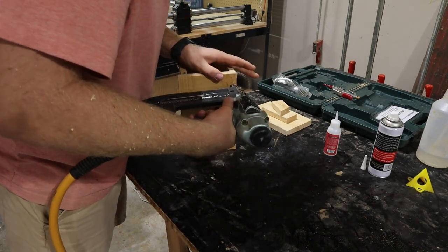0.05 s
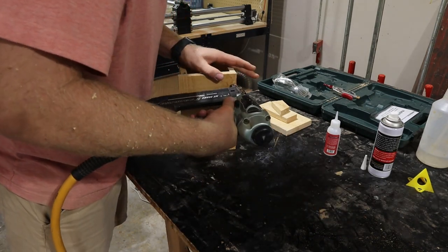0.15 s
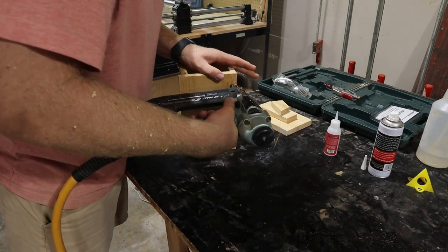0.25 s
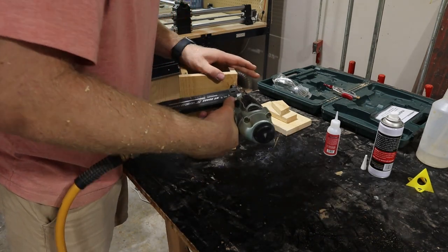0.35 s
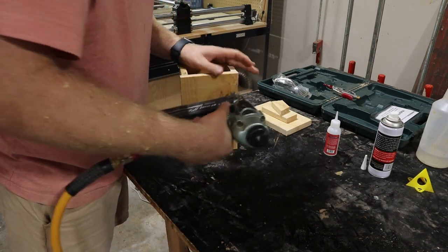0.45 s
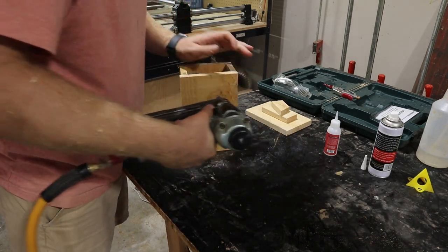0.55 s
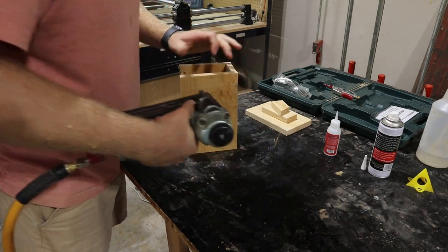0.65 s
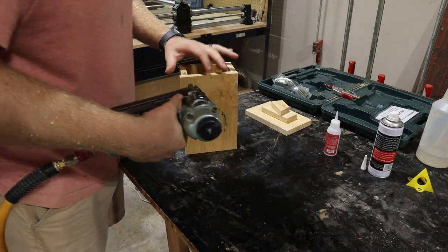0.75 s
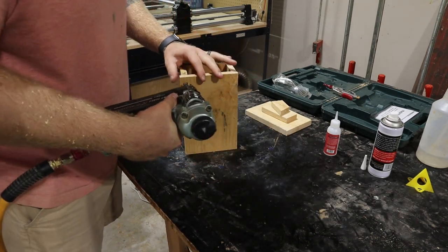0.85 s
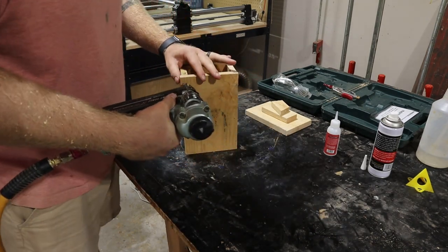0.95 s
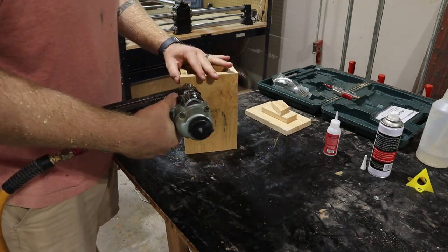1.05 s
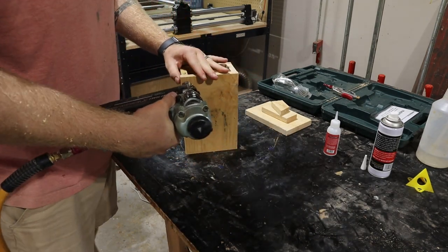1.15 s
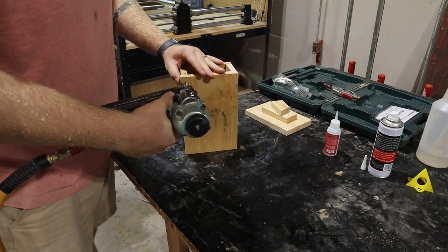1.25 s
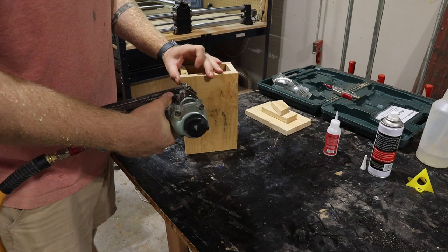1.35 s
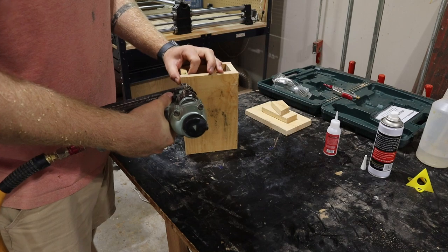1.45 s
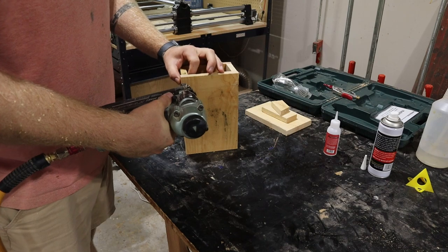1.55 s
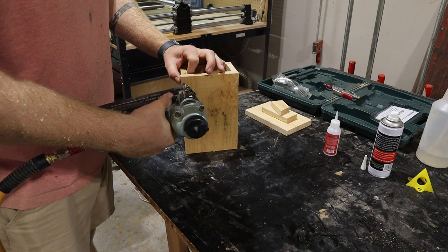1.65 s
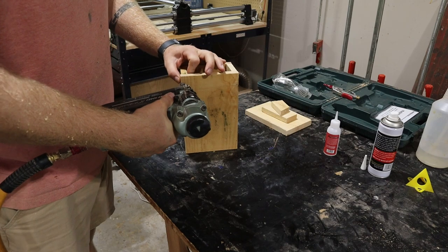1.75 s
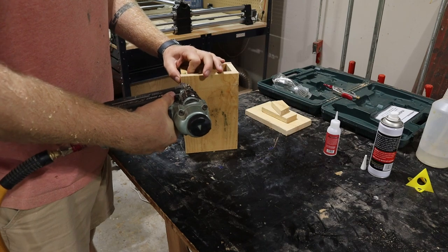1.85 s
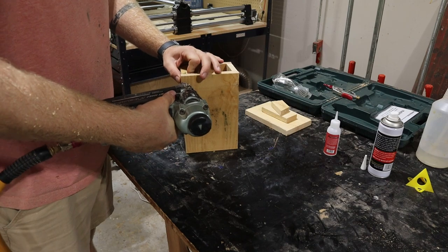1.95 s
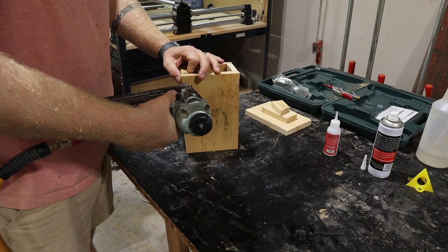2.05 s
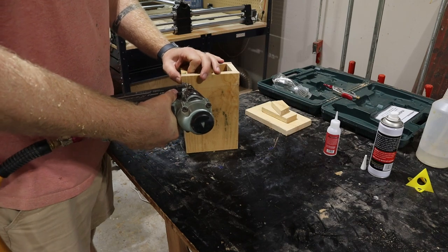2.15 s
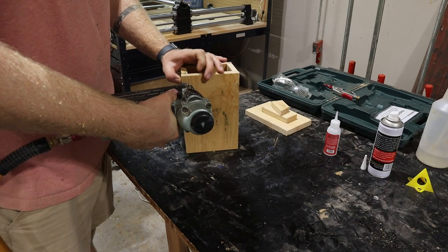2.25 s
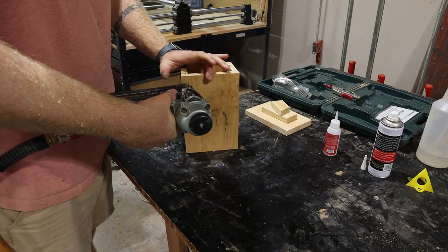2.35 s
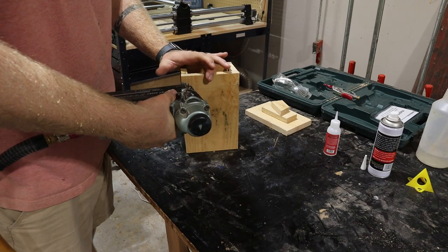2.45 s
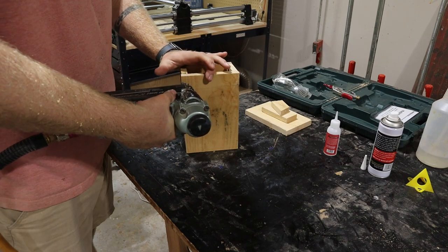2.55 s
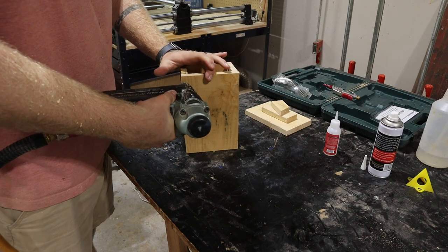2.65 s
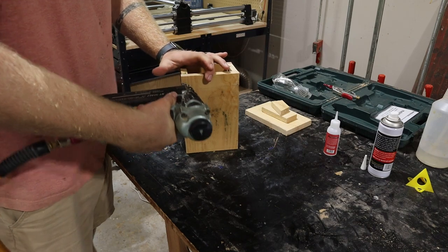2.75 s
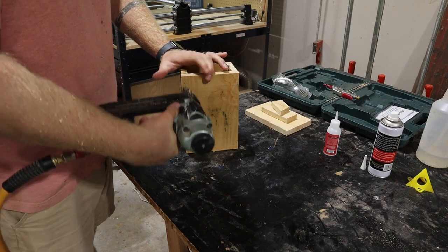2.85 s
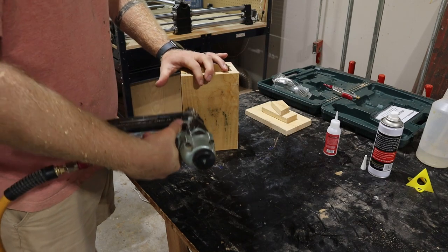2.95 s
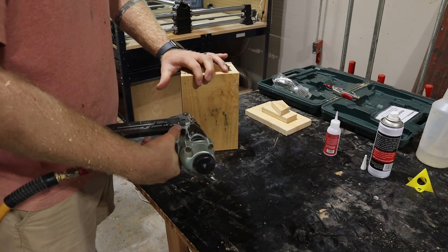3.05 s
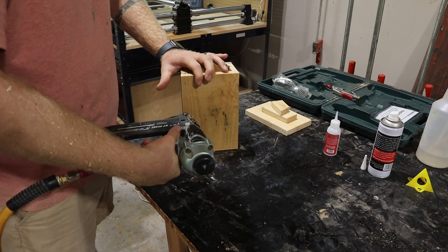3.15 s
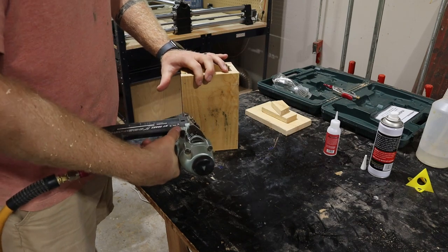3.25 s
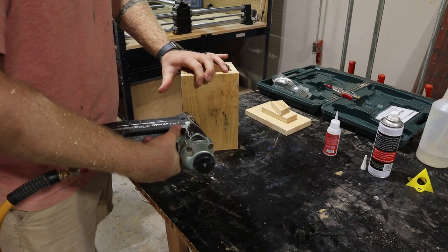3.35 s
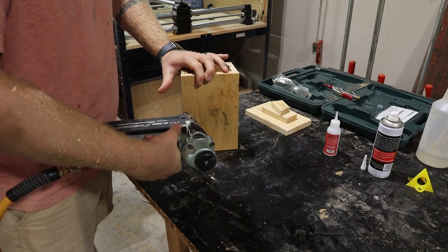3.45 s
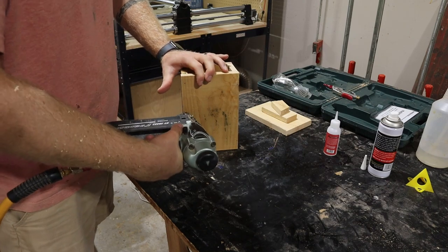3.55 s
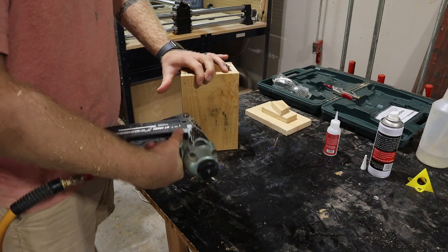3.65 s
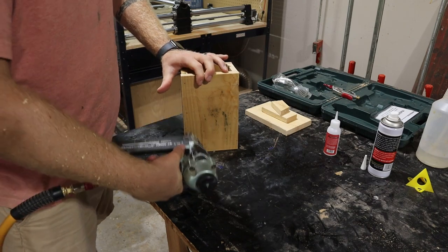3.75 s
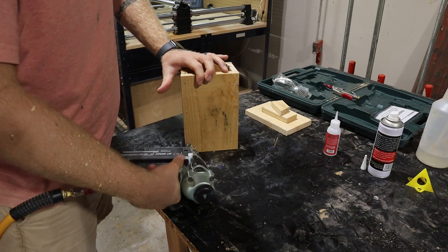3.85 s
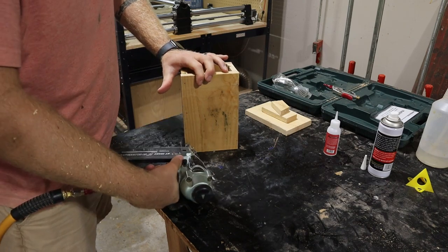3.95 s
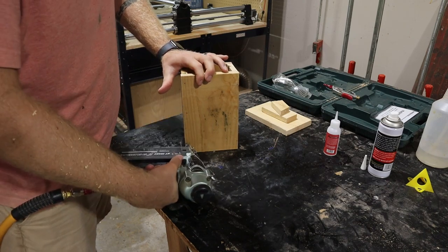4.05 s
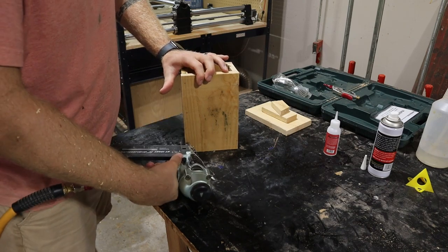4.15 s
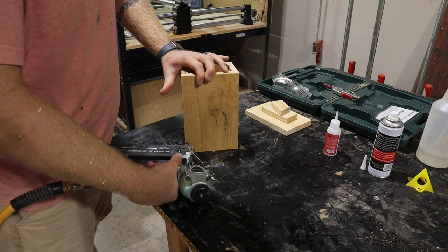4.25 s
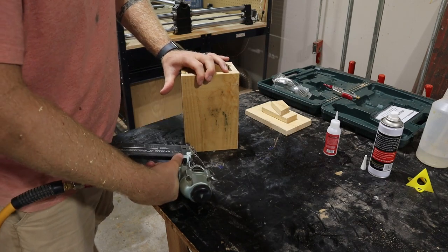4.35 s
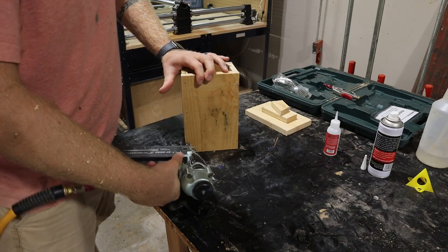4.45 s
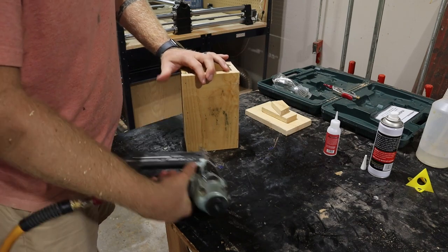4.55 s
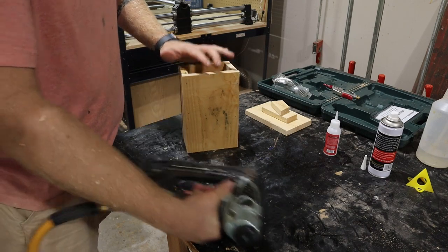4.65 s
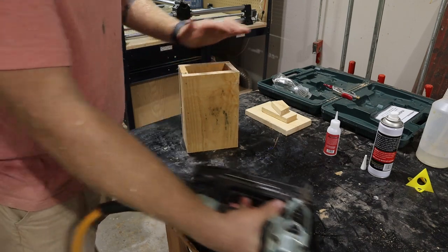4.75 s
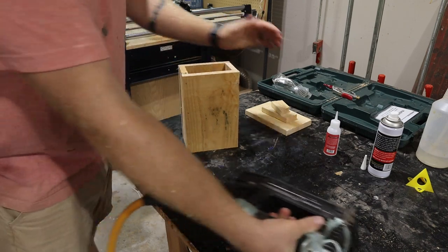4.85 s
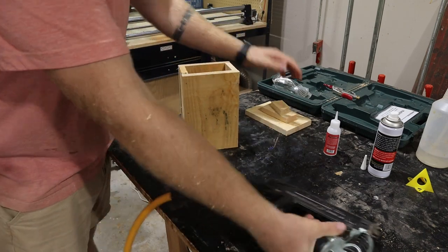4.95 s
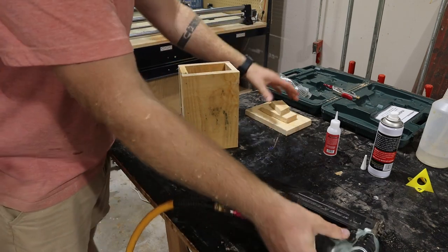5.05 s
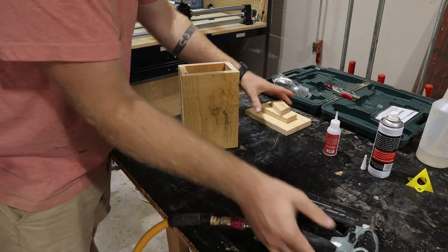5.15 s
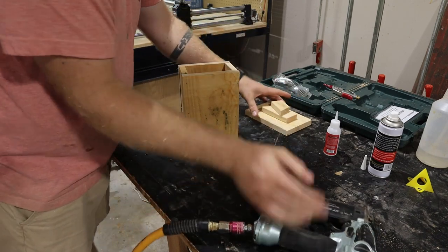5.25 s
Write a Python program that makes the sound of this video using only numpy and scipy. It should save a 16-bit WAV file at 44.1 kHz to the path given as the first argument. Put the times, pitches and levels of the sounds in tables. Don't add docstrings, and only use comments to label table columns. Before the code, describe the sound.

One early nail gun bang, a pause with soft handling and nose knocks on wood, then three more bangs under a second apart. Every bang has a hard double-hit attack and a brief air exhaust just after. Low hum and rustling lie far beneath. At the end the tool rattles down on the bench with woody thuds. Mono, close microphone, distorted peaks, pumping gain and short room reverberation.

```python
import sys
import numpy as np
from scipy import signal
from scipy.fft import rfft, irfft
from scipy.io import wavfile

SR = 44100
rng = np.random.default_rng(int(sys.argv[2]) if len(sys.argv) > 2 else 0)


def gain_from_decibels(decibels):
    exponent = np.asarray(decibels, float) / 20
    return 10 ** exponent


def bounce(signal):
    frames = np.transpose(np.atleast_2d(signal))
    limited = np.clip(frames, -1, 1)
    pcm = np.round(limited * 32767).astype(np.int16)
    wavfile.write(sys.argv[1], SR, pcm)


N = 233681
BLAST_S = .0030

# strike t/s, strike level/dB, driver ring f/Hz, bumper level/dB, box thump level/dB
SHOTS = [
    (0.263, -3.5, 1810, -5, -12.5),
    (2.6575, 1.5, 1692, -0.5, -24.5),
    (3.5576, 2.5, 1850, -0.5, -43),
    (4.3860, -0.5, 1460, -4, -5),
]
# valve t/s, valve level/dB, closing level/dB, air puff level/dB, puff f/Hz
RELEASES = [
    (0.3573, 0, 6.5, -25.5, 140),
    (2.7750, -1, 10.5, -22, 240),
    (3.6622, 2.5, 5, -18.5, 71),
    (4.5, -3.5, 6.5, -20, 124),
]
# f/Hz, level per Hz/dB
JET = [(120, -32), (200, -6), (1300, -20), (3290, 1.5), (3660, 1.5), (4320, -7.5), (5180, 4), (7180, -1.5),
       (12400, 4.5), (15400, 3.5)]
# t/s, rustle level/dB
BUSTLE = [(0, -70.5), (1.0, -71.5), (1.27, -68), (1.45, -64), (1.68, -67), (2.15, -58.5), (2.35, -61),
          (2.6, -59), (3.15, -68.5), (3.5, -61.5), (4.15, -68), (4.3, -62), (4.9, -71.5), (5.02, -73.5),
          (5.15, -53.5), (5.3, -58.5)]


def at_hz(points, hz):
    table = np.array(points)
    return np.interp(np.log(hz), np.log(table[:, 0]), table[:, 1])


def noise(spectrum, size):
    hz = np.maximum(np.fft.rfftfreq(size, 1 / SR), 1)
    x = irfft(rfft(rng.standard_normal(size)) * gain_from_decibels(at_hz(spectrum, hz)), size)
    return x / np.std(x)


def band(x, lo_hz, hi_hz):
    return signal.sosfilt(signal.butter(2, [lo_hz, min(hi_hz, .45 * SR)], "band", fs=SR, output="sos"), x)


def dying(t60, rise=0.00074):
    t = np.arange(SR // 4) / SR
    return (1 - np.exp(-t / rise)) * gain_from_decibels(-60 * t / t60)


def ring(hz, t60, rise=0.00085):
    return dying(t60, rise) * np.sin(2 * np.pi * hz * np.arange(SR // 4) / SR)


def thump(t60, hi_hz):
    low = band(rng.standard_normal(SR // 4), 22, hi_hz)
    rumble = dying(t60, rise=0.00051) * gain_from_decibels(-2.5) * low / np.std(low)
    return rumble + ring(0.39 * hi_hz, 1.6 * t60, rise=0.0011)


def click():
    white = rng.standard_normal(SR // 4)
    bright = band(white, 3000, 15000) + gain_from_decibels(11.5) * band(white, 4840, 6160)
    return bright * dying(0.015, rise=0.0005)


def add(out, s, x):
    i = round(s * SR)
    out[i:i + len(x)] += x[:N - i]


def shop():
    # f/Hz, width/Hz, level/dB
    hums = [(94.4, 6, -4), (193.6, 3.6, -4.5), (360, 66, -6), (587, 41, -12), (859, 34, -5.5)]
    # t/s, level/dB
    machine = [(0, -67), (1.3, -70), (1.95, -60), (2.15, -61.5), (2.35, -59), (2.6, -61), (3.1, -89),
               (4.2, -82), (4.85, -72.5), (5.3, -61)]
    # f/Hz, level per Hz/dB
    rustle_colour = [(15, -39), (25, -21), (97, -4.5), (155, -9.5), (186, -7.5), (247, -15), (289, -5.5),
                     (682, -14), (862, -8.5), (1120, -13), (2860, -24), (7110, -43), (12600, -50),
                     (16400, -86.5), (22000, -120)]
    # f/Hz, level per Hz/dB
    scuff_colour = [(1200, -22), (2600, -1), (3600, 3), (4400, -8), (5500, -6), (7500, -16.5),
                    (12600, -18.5), (13400, -40)]
    # middle t/s, half length/s, level/dB
    slides = [(0, 0.24, -84), (1.017, 0.085, -90.5), (1.434, 0.18, -76), (1.94, 0.1, -76),
              (2.45, 0.75, -72.5), (4.29, 0.17, -73), (4.959, 0.087, -80.5)]
    t = np.arange(N) / SR

    hum = np.zeros(N)
    for hz, width, db in hums:
        waver = band(rng.standard_normal(N), hz - width / 2, hz + width / 2)
        hum += gain_from_decibels(db) * waver / np.std(waver)

    flicker = band(rng.standard_normal(N), 2.5, 40)
    rustle = noise(rustle_colour, N) * gain_from_decibels(0.5 * flicker / np.std(flicker))

    catch = band(rng.standard_normal(N), 3.7, 150)
    sliding = gain_from_decibels(-81.5) + np.zeros(N)
    for s, half, db in slides:
        sliding += gain_from_decibels(db) * np.exp(-((t - s) / half) ** 2)
    scuff = noise(scuff_colour, N) * sliding * gain_from_decibels(1.83 * catch / np.std(catch))

    hum_level = gain_from_decibels(np.interp(t, *np.transpose(machine)) - 3.0)
    rustle_level = gain_from_decibels(np.interp(t, *np.transpose(BUSTLE)))
    return scuff + hum_level * hum + rustle_level * rustle


def crumbs():
    hits_per_s, crumb_t60_s, crumb_db = 58, .025, 14.5
    mains_hz, mains_width_hz, mains_db = 56, 7.9, -75.5
    t = np.arange(N) / SR
    strength = gain_from_decibels(3.5 * np.minimum(rng.exponential(1, N), 3))
    hits = (rng.random(N) < hits_per_s / SR) * strength
    dealt = rng.integers(0, 6, N)
    out = np.zeros(N)
    for k, hz in enumerate(np.geomspace(300, 5000, 6)):
        shake = signal.lfilter([1], [1, -gain_from_decibels(-60 / (crumb_t60_s * SR))], hits * (dealt == k) + 1e-18)
        grain = band(rng.standard_normal(N), hz / 1.4, hz * 1.1)
        out += gain_from_decibels(-3.5 * k) * shake * grain / np.std(grain)
    mains = band(rng.standard_normal(N), mains_hz - mains_width_hz / 2, mains_hz + mains_width_hz / 2)
    level = gain_from_decibels(np.interp(t, *np.transpose(BUSTLE)) + crumb_db - 18)
    return level * out + gain_from_decibels(mains_db) * mains / np.std(mains)


def steel():
    # t/s, level/dB, ring f/Hz, ring level over the click/dB
    parts = [(0.025, -60, 5500, -21.5), (0.0744, -40.5, 3120, 6.5), (1.458, -54, 3210, 4),
             (1.718, -63, 8440, -12), (1.8908, -46, 6470, -16), (2.322, -62, 2000, 6.5),
             (2.531, -63, 5000, -6), (2.58, -63, 6550, -3), (3.188, -65, 2300, 4), (3.361, -45.5, 3900, -4),
             (3.494, -64, 6000, -6), (4.055, -52, 4940, -5), (4.207, -44, 3070, 9), (5.037, -32, 3910, 2),
             (5.058, -42, 6280, -2), (5.068, -43, 7500, -6), (5.14, -52, 5240, -3), (5.285, -48.5, 5560, 8)]
    out = np.zeros(N)
    for s, db, hz, ring_db in parts:
        add(out, s, gain_from_decibels(db) * (click() + gain_from_decibels(ring_db) * ring(hz, 0.025)))
    return out


def knocks(rows, click_db):
    out = np.zeros(N)
    for s, wood_db, wood_hz, hard_db in rows:
        white = rng.standard_normal((2, SR // 4))
        grain = band(white[1], .45 * wood_hz, 2.2 * wood_hz)
        wood = ring(wood_hz, 0.04, rise=0.00054) + gain_from_decibels(10.5) * grain * dying(0.026, rise=0.00087)
        wood += gain_from_decibels(-6.0) * (ring(501, 0.047) - ring(1120, 0.0064))

        tick_hz = 1620 * gain_from_decibels(2 * rng.standard_normal())
        tick = gain_from_decibels(-7.5) * ring(tick_hz, 0.016)
        tick += gain_from_decibels(1.0) * band(white[0], 1100, 3600) * dying(0.029, rise=0.00075)
        hard = gain_from_decibels(5.0) * tick + gain_from_decibels(click_db) * click()
        add(out, s, gain_from_decibels(wood_db - 2.0) * wood + gain_from_decibels(wood_db + hard_db) * hard)
    return out


def blow(db, crack_db):
    # f/Hz, level/dB, t60/s
    body = [(480, -11, .025), (820, -7, .03), (1180, -8, .025), (2050, -8, .016), (2550, -10, .014),
            (3600, -14, .01), (5300, -13, .01)]
    # f/Hz, level per Hz/dB
    crack_colour = [(200, -7), (800, -3.5), (2200, 4), (4000, -0.5), (6000, -9.5), (9000, -14.5),
                    (13000, -24.5), (17000, -44.5)]
    modes = np.zeros(SR // 4)
    for hz, mode_db, t60 in body:
        a, b = rng.standard_normal(2)
        modes += gain_from_decibels(mode_db + 1.3 * a) * np.sign(b) * ring(hz * gain_from_decibels(0.071 * b), t60)
    snap = gain_from_decibels(0.5) * dying(0.0043, rise=.0001) * noise(JET, SR // 4)
    crack = gain_from_decibels(crack_db) * dying(0.018) * noise(crack_colour, SR // 4)
    return gain_from_decibels(db) * (modes + snap + crack)


def shots():
    inrush_s, bumper_s, rebound_s, settle_s = .0058, .0056, .0092, .0125
    out, t = np.zeros(N), np.arange(SR // 4) / SR
    size = round(inrush_s * SR)
    tightening = t - 0.000281 * (1 - np.exp(-t / 0.00058))
    sunk = np.exp(-(t / .0014) ** 2) * (1 - np.exp(-t / .00005))
    for s, strike_db, ring_hz, bumper_db, thump_db in SHOTS:
        add(out, s - inrush_s, gain_from_decibels(-35.5) * np.linspace(0, 1, size) ** 0.43 * noise(JET, size))
        add(out, s, -gain_from_decibels(strike_db) * sunk * np.sin(2 * np.pi * 1.134 * ring_hz * tightening))
        add(out, s, blow(bumper_db - 13.5, crack_db=10.5))

        bumper = blow(bumper_db, crack_db=0.5)
        bumper += gain_from_decibels(bumper_db - 6) * ring(1.3 * ring_hz, 0.0027)
        bumper += gain_from_decibels(thump_db) * thump(0.038, hi_hz=321)
        add(out, s + bumper_s, bumper)
        add(out, s + rebound_s, blow(bumper_db + .5, crack_db=1.5))
        add(out, s + settle_s, blow(bumper_db - 2.5, crack_db=-0.5))
    return out


def exhaust():
    # f/Hz, level per Hz/dB
    spill = [(120, -50.5), (200, -6), (461, -14.5), (872, -6), (1500, -14), (2330, -10), (2590, -7.5),
             (3600, -9.5), (9090, -9.5), (12400, -4), (15400, -9.5)]
    closing_s, blast_db, puff_cycles = .0268, -2.5, 6.4
    direct, spilled = np.zeros(N), np.zeros(N)
    t = np.arange(SR // 4) / SR
    shut = 1 / (1 + np.exp(np.clip((t - closing_s + BLAST_S) / .0008, -50, 50)))
    pressure = dying(1.0, rise=0.00012) * shut
    for s, valve_db, closing_db, puff_db, puff_hz in RELEASES:
        valve = ring(1970, 0.005, rise=0.00055) + gain_from_decibels(5) * ring(2530, 0.0038, rise=0.00074)
        add(direct, s, -gain_from_decibels(valve_db) * valve)

        closing = (ring(1410, 0.0082, rise=0.00039) + ring(2400, 0.015, rise=0.00024)) / 2
        add(direct, s + closing_s, gain_from_decibels(closing_db) * closing)
        add(direct, s + closing_s + 0.00075, blow(closing_db - 19.5, crack_db=7.0))

        add(direct, s + BLAST_S, gain_from_decibels(blast_db) * pressure * noise(JET, len(t)))
        add(spilled, s + BLAST_S, gain_from_decibels(blast_db) * pressure * noise(spill, len(t)))
        puff = thump(puff_cycles / puff_hz, hi_hz=3.9 * puff_hz)
        add(direct, s + BLAST_S - .0015, -gain_from_decibels(puff_db) * puff)
    return direct, spilled


def room(x):
    # f/Hz, t60/s, level/dB
    tail_table = [(102.3, 0.48, -23), (302, 0.23, -4), (850, 0.37, 2.5), (2000, 0.43, -1), (5570, 0.39, -2),
                  (12200, 0.29, -7.5)]
    t60_points, db_points = [r[:2] for r in tail_table], [r[::2] for r in tail_table]
    edges = 50 * 2 ** (np.arange(27) / 3)
    white, tail = rng.standard_normal((2, N)), np.zeros(N)
    build = np.exp(-1 / (0.00043 * SR))
    for k, (lo, hi) in enumerate(zip(edges, edges[1:])):
        t60, db = at_hz(t60_points, lo), at_hz(db_points, lo)
        keep = gain_from_decibels(-120 / (t60 * SR))
        energy = band(x + 1e-9 * white[0], lo, hi) ** 2
        decay = np.convolve([1, -keep], [1, -build])
        stored = signal.lfilter([(1 - keep) * (1 - build)], decay, energy)
        carrier = band(white[k % 2], lo, hi)
        tail += gain_from_decibels(db) * np.sqrt(np.abs(stored)) * carrier / np.std(carrier)
    return tail


def scene():
    # t/s, wood level/dB, wood f/Hz, hardness of the tick over the wood/dB
    touches = [(0.075, -36.5, 1134, -20), (0.0765, -33.5, 557, -29), (1.351, -55, 609, 1.5),
               (1.383, -51, 356, 4.5), (1.581, -55, 346, 6.5), (1.812, -46.5, 255, -30),
               (1.852, -54, 1750, -12), (1.976, -29, 956, -10), (1.977, -30.5, 530, -25),
               (1.998, -43, 460, -8), (2.06, -41.5, 386, -2.5), (2.146, -45, 340, -30),
               (2.198, -50, 570, -2.5), (2.264, -40.5, 1250, -4.5), (2.27, -42.5, 467, -17),
               (3.163, -46, 477, -3), (3.175, -45.5, 207, -7), (3.393, -45, 490, -9),
               (3.406, -29.5, 553, -4.5), (3.408, -35, 1350, -24), (3.463, -43.5, 367, -7),
               (4.016, -42, 510, -9), (4.026, -37.5, 428, -14), (4.076, -44.5, 517, -3),
               (4.207, -29, 441, -7), (4.214, -39, 405, 6), (4.253, -41, 574, -4), (4.336, -43, 605, -1),
               (2.118, -50, 446, -25)]
    # same columns
    # t/s, wood level/dB, wood f/Hz, hardness of the tick over the wood/dB
    set_down = [(5.033, -40, 1340, -6), (5.038, -28.5, 705, 5.5), (5.056, -29.5, 854, -9),
                (5.067, -36.5, 488, 3), (5.088, -37, 345, -4), (5.131, -34, 850, 0.5), (5.14, -49, 940, -9),
                (5.167, -36, 270, -12), (5.178, -38, 358, -6.5), (5.23, -21.5, 730, -11),
                (5.233, -21.5, 282, -19), (5.243, -29, 900, -25), (5.255, -30.5, 481, -17),
                (5.28, -25.5, 700, -26), (5.285, -24, 420, -7.5), (5.292, -25, 474, -30),
                (5.041, -28.5, 295, -25)]
    background = shop() + crumbs()
    wood = steel() + knocks(touches, click_db=-8) + knocks(set_down, click_db=-21)
    gun = shots()
    blast, spilled = exhaust()
    wet = room(gain_from_decibels(-1.5) * gun + gain_from_decibels(-5.5) * spilled + gain_from_decibels(-6.5) * wood)
    return np.tile(gun + blast + wood + wet + background, (2, 1))


def gain_control():
    attack_s, easing = 0.0051, 1.61
    # t/s, depth/dB, hold/s, recovery/s; a harder strike ducks the gain further
    dips = [(r[0], 24.5 + 1.01 * r[1], 0.038, 0.16) for r in SHOTS]
    dips += [(r[0] + BLAST_S, 28, 0.044, 0.13) for r in RELEASES]
    t, dip = np.arange(N) / SR, np.zeros(N)
    for s, depth_db, hold, recovery in dips:
        left = depth_db * np.clip(1 - (t - s - hold) / recovery, 0, 1) ** easing
        dip = np.maximum(dip, left * (t >= s))
    r = np.exp(-1 / (attack_s * SR))
    return gain_from_decibels(-signal.lfilter([1 - r], [1, -r], dip))


def top_cut(x):
    return signal.sosfilt(signal.butter(12, 17000, fs=SR, output="sos"), x)


def record(dry):
    clip = .122
    x = dry * gain_control() / clip
    x = clip * x / (1 + np.abs(x) ** 6) ** (1 / 6)
    x = signal.sosfilt(signal.cheby2(10, 44, 16000, fs=SR, output="sos"), x)
    x = signal.sosfilt(signal.butter(2, 24, "high", fs=SR, output="sos"), x)
    return top_cut(x)


dry = scene()
out = record(dry)
bounce(out)
```